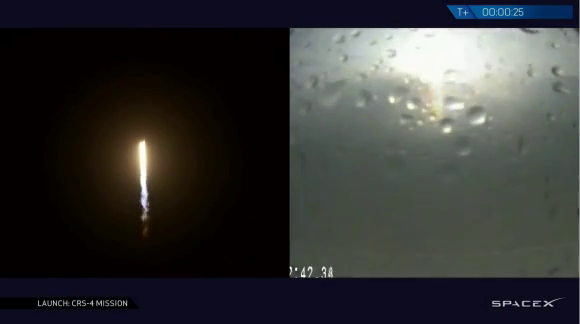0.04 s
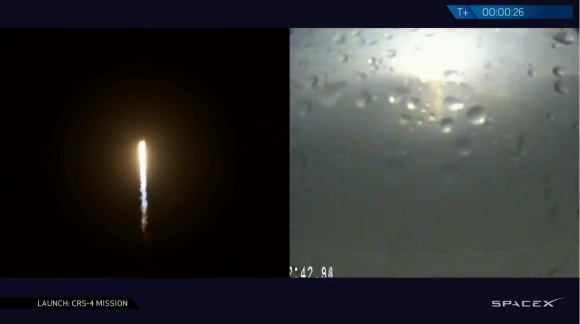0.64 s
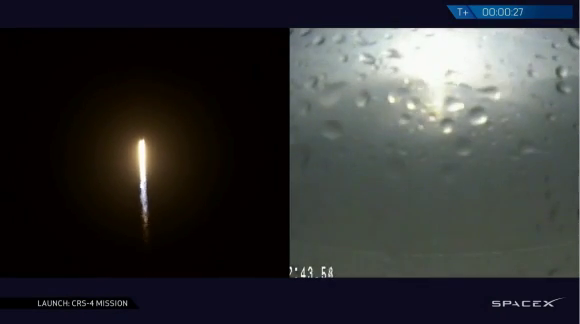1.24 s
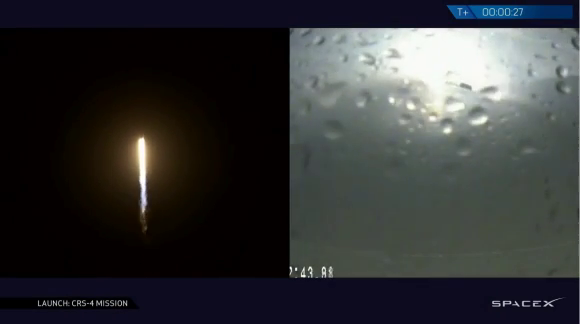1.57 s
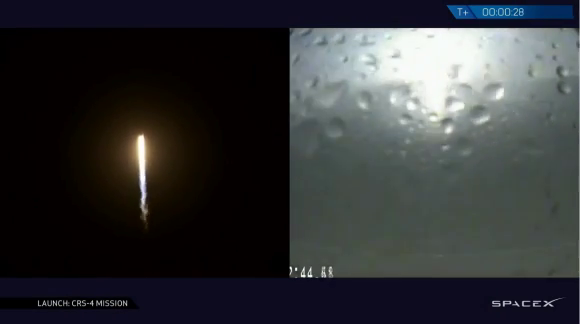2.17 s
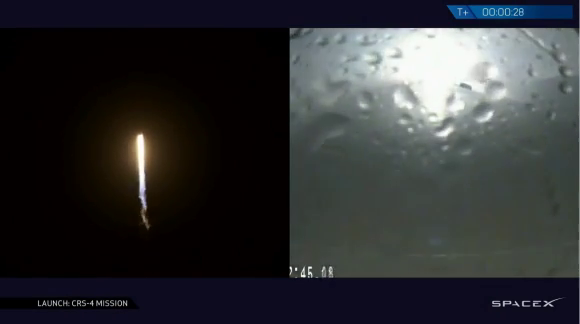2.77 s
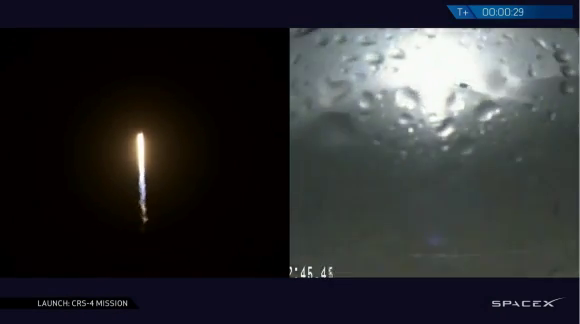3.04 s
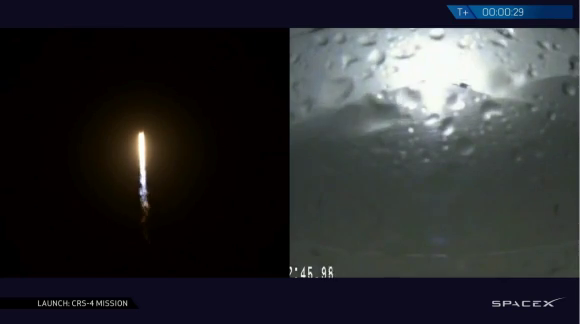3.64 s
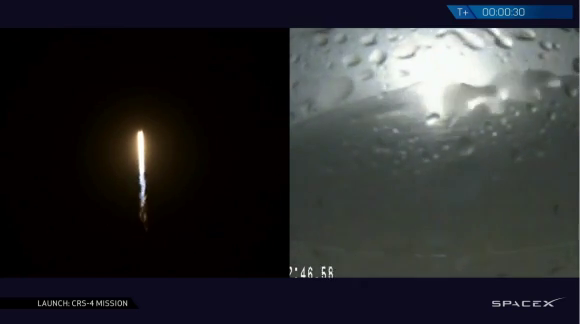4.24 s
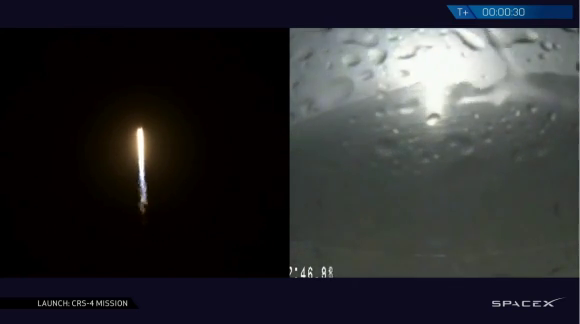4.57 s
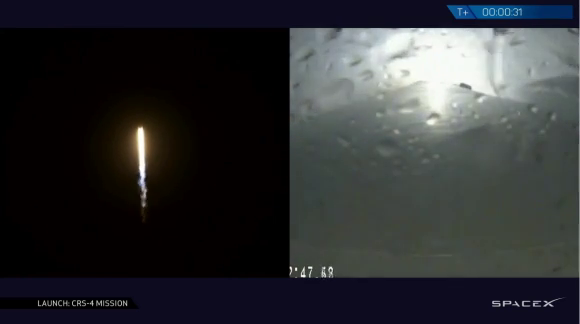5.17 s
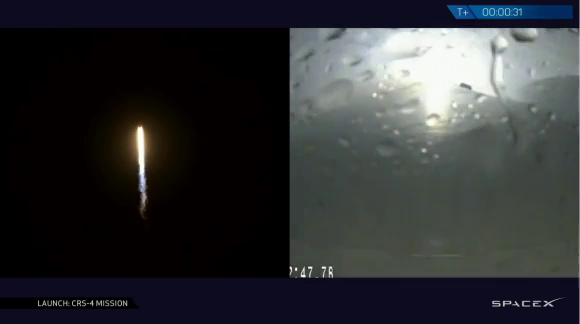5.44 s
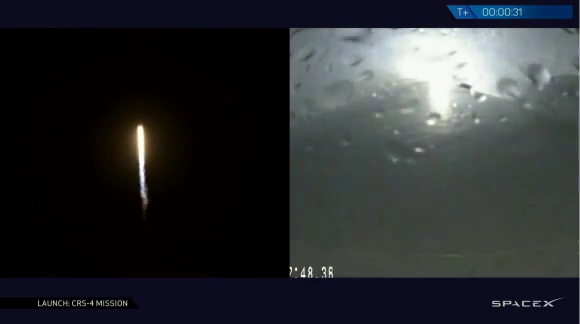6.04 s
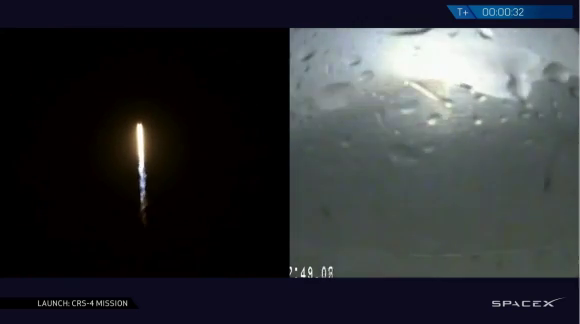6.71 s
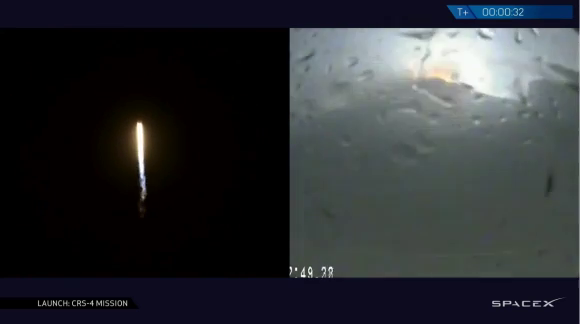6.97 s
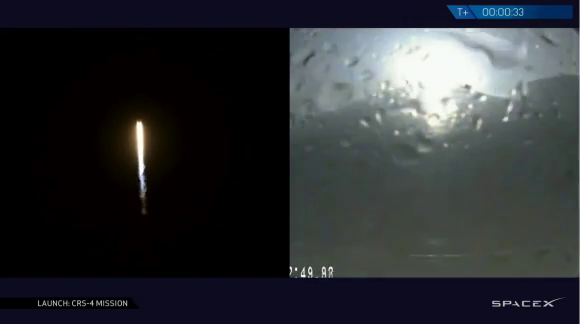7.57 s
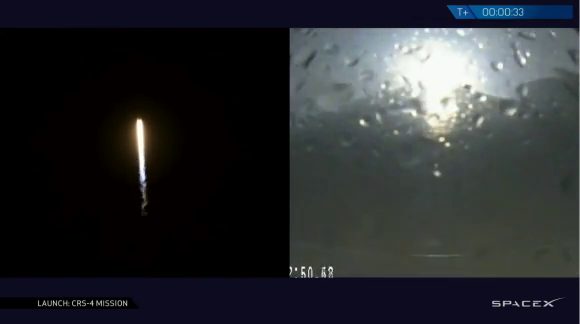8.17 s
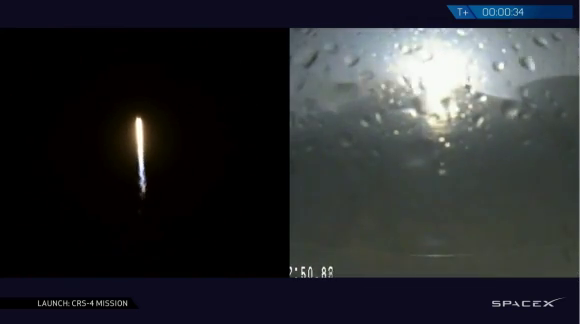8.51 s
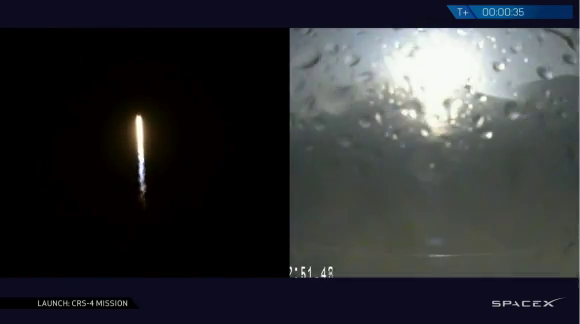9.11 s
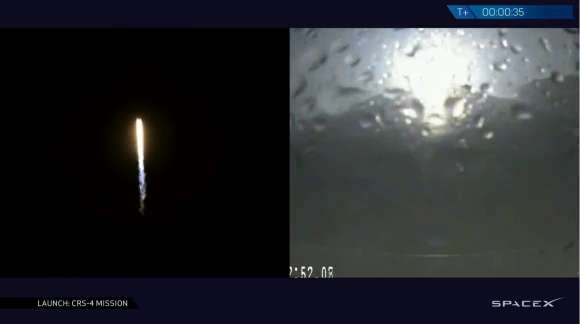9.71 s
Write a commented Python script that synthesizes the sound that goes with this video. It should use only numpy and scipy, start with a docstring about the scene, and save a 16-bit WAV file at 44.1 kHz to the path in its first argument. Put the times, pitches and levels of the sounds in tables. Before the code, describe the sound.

The deep, rushing roar of a climbing rocket, full of sharp crackles, gradually recedes into a low rumble.

```python
"""On open ground beside a wall, one microphone listens to a rocket climbing away at full thrust.
Turbulence in the exhaust rumbles, and its steepest waves arrive as sawtooth shocks that crackle.
With distance the roar sinks and the air takes its top, while the deep bass stays; moving air
brings it back in swells. Close to the microphone a few dry ticks sound, and late on a faint hiss."""
import sys
import numpy as np
from scipy import signal
from scipy.fft import rfft, irfft, next_fast_len
from scipy.io import wavfile

SR = 44100
rng = np.random.default_rng(int(sys.argv[2]) if len(sys.argv) > 2 else 0)


def materialize(psi):
    """Save the field psi as 16-bit PCM at rate SR to the path in sys.argv[1].

    A 1-D psi becomes a single channel; in a 2-D psi each row is a channel.
    """
    bounded = np.clip(np.atleast_2d(psi).T, -1, 1)
    quanta = np.round(bounded * 32767).astype(np.int16)
    wavfile.write(sys.argv[1], SR, quanta)


N = 438177
TIME = np.arange(N) / SR

# moving air carries the roar down in swells: start_s, length_s, start_lift_db, end_lift_db
AIR_SWELLS = [(-0.05, 0.93, 1, 2), (1.62, 0.38, 2.5, 3), (2.75, 0.92, 1.4, 2), (3.9, 1, 1.8, 0.5),
              (5.1, 0.75, -1, 1.7), (7.12, 0.072, 2, 1.5), (7.38, 0.2, 3, -0.5), (8.05, 0.22, 1.1, 2.5),
              (8.31, 0.11, 3.5, 7.5), (8.61, 0.37, 5, 6)]


def amp(db):
    """Decibels to gain."""
    return 10 ** (np.asarray(db) / 20)


def unit_rms(x):
    """Scales x to rms 1."""
    return x / np.sqrt(np.mean(x ** 2) + 1e-20)


def curve(rows):
    """A table of times and values, read at every sample."""
    return np.interp(TIME, *np.transpose(rows))


def add(mix, start_s, sound):
    """Mixes a sound in at start_s."""
    part = mix[max(round(start_s * SR), 0):][:len(sound)]
    part += sound[:len(part)]


def below(x, hz):
    """The part of x under hz, with no delay."""
    return signal.sosfiltfilt(signal.butter(3, hz, fs=SR, output="sos"), x + 1e-18, padtype="even")


def delayed(x, delay_s):
    """x heard later by a delay that may move."""
    return np.interp(TIME - delay_s, TIME, x, left=0)


def coloured(x, colour):
    """Gives x a spectrum; a quarter turn of phase makes each click a sawtooth: slow rise, sudden drop."""
    hz, db = np.transpose(colour)
    size = next_fast_len(N + SR)
    bins_hz = np.fft.rfftfreq(size, 1 / SR)
    gain = amp(np.interp(np.log(bins_hz + 1), np.log(hz + 1), db))
    return irfft(rfft(x, size) * 1j * gain, size)[:N]


def sawteeth(clicks, colour):
    """Colours clicks so that a click of 1 makes a wave of peak 1."""
    return coloured(clicks, colour) / abs(coloured(signal.unit_impulse(N, "mid"), colour)).max()


def wander(rate_hz):
    """Random motion of rms 1, mostly slower than rate_hz."""
    step = 50
    t = np.arange(-SR, N + SR, step) / SR
    return unit_rms(np.interp(TIME, t, below(rng.standard_normal(len(t)), rate_hz * step)))


def swells(rows, edge_s=0.06):
    """Lift in dB: each swell comes in, leans up or down while it lasts, and falls back."""
    total_db = np.zeros(N)
    for start_s, length_s, *lift_db in rows:
        end_s = start_s + length_s
        gate = np.clip(.5 + np.minimum(TIME - start_s, end_s - TIME) / edge_s, 0, 1)
        total_db += np.interp(TIME, [start_s, end_s], lift_db) * gate
    return total_db


def plume(shocks_per_s=1150, steepening=1.35, steep_hz=3000, billow_db=0.95, billow_hz=45):
    """Smooth turbulence and one-sided shocks of very unequal size, bunched by billows in the jet."""
    # the jet grows more ragged as it climbs, and more so in a swell
    spread_db = 2.15 + .06 * TIME + .02 * swells(AIR_SWELLS)
    size = amp(spread_db * np.minimum(rng.exponential(1, N), 3.9))
    hit = rng.random(N) < shocks_per_s / SR
    trim = 1 / amp(spread_db ** 2 / 2)  # offsets the power that raggedness adds
    shocks = unit_rms(size * trim * hit)
    # the larger a shock, the steeper its front: the big ones own the treble
    steep = unit_rms(size ** steepening * trim * hit)
    shocks = below(shocks - shocks.mean(), steep_hz) + steep - below(steep, steep_hz)
    turbulence = amp(-1) * below(rng.standard_normal(N), 2 * steep_hz)
    return (turbulence + shocks) * amp(billow_db * wander(billow_hz))


def ground_scatter(x, tail_db=-6, t60_s=0.15):
    """Rough ground smears every click into a short diffuse tail."""
    decay = amp(-120 / (t60_s * SR))
    power = signal.lfilter([1 - decay], [1, -decay], x ** 2)
    return x + amp(tail_db) * np.sqrt(power) * rng.standard_normal(N)


def restless_air(x, strength=.1, fade_hz=1.1, stretch=.13, drift_hz=.4, top_hz=2000):
    """Bent paths through moving air stretch, shrink and fade, so a faint hollowness drifts about."""
    # extra travel time of each bent path: delay_s
    bent_paths = [.0021, .0033, .0047, .0074]
    paths = sum(wander(fade_hz) * delayed(x, delay_s * (1 + stretch * wander(drift_hz)))
                for delay_s in bent_paths)
    return x + strength * below(paths, top_hz)


def ground_echo(x, strength=.11, top_hz=1200):
    """The soft ground returns a faint, dull copy to the microphone."""
    # the echo shifts as the rocket moves: time_s, delay_s
    ground_delay = [(1.5, .0059), (4, .0047), (6.3, .0052), (9, .0044)]
    return x + strength * below(delayed(x, curve(ground_delay)), top_hz)


def wall_echo(x, dull_gain=0.17, dull_hz=480):
    """The nearby wall returns mostly the lows, which comb-filters the bass."""
    # the echo comes a little later as the rocket rises: time_s, delay_s
    wall_delay = [(0, .0109), (4, .01105), (8, .0114)]
    # the crisp, full-band part of the echo: time_s, gain
    crisp_part = [(0, 0.21), (4, 0.04), (6, 0), (7.6, 0.01), (8.6, 0.31), (9.94, 0.01)]
    echo = delayed(x, curve(wall_delay))
    return x + dull_gain * below(echo, dull_hz) + curve(crisp_part) * echo


def registers(x, deep_hz=125, rumble_hz=260, crackle_hz=1400):
    """Splits x into deep bass, rumble, roar and crackle, each of rms 1."""
    deep, low, body = below(x, deep_hz), below(x, rumble_hz), below(x, crackle_hz)
    return np.array([unit_rms(band) for band in (deep, low - deep, body - low, x - body)])


def exhaust(near_s=1, midway_s=4.2, receding_s=6.2, far_s=8.0, heave_db=0.6, rip_db=1.03):
    """The plume heard from the ground: distance shifts its colour and fades each register in its way."""
    # the exhaust's spectrum at four growing distances: frequency_hz, level_db
    near_colour = [(22, -22.5), (48, -13.5), (78, 0), (130, -3.5), (195, -0.5), (240, -1), (350, -9.5),
                   (410, -10), (520, -9.5), (660, -11.5), (810, -13), (1400, -18.5), (2100, -25.5),
                   (3000, -33.5), (5000, -53), (7000, -61), (10000, -69.5), (14000, -83)]
    midway_colour = [(22, -24.5), (48, -9.5), (80, -1.5), (135, -2.5), (175, -2), (225, -10.5), (290, -4.5),
                     (355, -4.5), (425, -13.5), (535, -9), (640, -14.5), (810, -14.5), (1400, -19.5),
                     (2100, -28.5), (3000, -36), (5000, -56), (8000, -71), (14000, -82.5)]
    receding_colour = [(22, -15), (35, -6.5), (54, 2), (100, 0.7), (140, -7.5), (178, -7), (205, -12),
                       (290, -8.5), (365, -13.5), (483, -15), (590, -20.5), (860, -19), (1280, -23.5),
                       (2000, -31), (3000, -39.5), (4500, -56.5), (7500, -76), (14000, -82.5)]
    far_colour = [(22, -13.5), (33, -7), (48, 1), (90, -2.5), (115, -1), (165, -1.9), (220, -8),
                  (290, -10.5), (450, -15.5), (540, -15.5), (700, -21.5), (900, -22), (1130, -26),
                  (1420, -28), (2000, -34), (3100, -44.5), (5000, -64.5), (7500, -81), (14000, -86.5)]
    # deep bass, rumble, roar and crackle sink, then level out: start_db, fall_db_per_s, floor_db
    distance_fades = [(-40.5, 4.5, -46), (-43.5, 3, -51), (-39, 2.5, -55), (-49.5, 2.5, -71.5)]
    arriving = restless_air(ground_scatter(plume()))
    at_microphone = hollow(wall_echo(ground_echo(arriving)))
    colours = [near_colour, midway_colour, receding_colour, far_colour]
    shares = [np.interp(TIME, [near_s, midway_s, receding_s, far_s], row) for row in np.eye(4)]
    bands = sum(share * registers(coloured(at_microphone, colour))
                for share, colour in zip(shares, colours))
    fades = [np.hypot(amp(start_db - fall * TIME), amp(floor_db))
             for start_db, fall, floor_db in distance_fades]
    swell = swells(AIR_SWELLS)
    low_surge, high_surge = billows()
    ebb_db = 10 * np.maximum(TIME - 9.35, 0)  # at last the low end ebbs too
    far = shares[-1]  # far away a swell brings back rasp, and no longer the deep bass
    deep_db = 0.82 * (1 - far) * swell + low_surge + heave_db * wander(rate_hz=5.8) - ebb_db
    rumble_db = 0.36 * swell + 0.26 * low_surge + heave_db * wander(rate_hz=3.3) - ebb_db / 2
    roar_db = swell + high_surge
    crackle_db = (0.67 + 0.26 * far) * swell + 0.43 * high_surge + rip_db * wander(rate_hz=24)
    return (bands * fades * amp([deep_db, rumble_db, roar_db, crackle_db])).sum(0)


def flurry(lead_s, decay_s):
    """Tiny shocks, of total energy 1, that gather to a peak 0.05 s in and die away."""
    t = TIME[:SR // 10] - 0.05
    shocks = rng.standard_normal(len(t)) * np.exp(-np.maximum(t / decay_s, -t / lead_s))
    return shocks / np.linalg.norm(shocks)


def cracks(front_hz=5500):
    """Each big shock has a front rounded by the air, a low thump, a snap and small shocks around it."""
    # the strongest shocks: time_s, level_db, then relative to that level thump_db, cluster_db, snap_db
    big_shocks = [(0.206, -36, -3, -1, 3), (0.235, -42, -4, 0.5, -7), (0.347, -32, -1, -3, -9),
                  (0.446, -33, -16, 2.5, -15.5), (0.489, -33, -5.5, 6.5, -11), (0.657, -37, -0.5, 4, 1.5),
                  (0.757, -29.5, -5.5, 5, -17), (0.799, -38.5, -7.5, 7.5, -9.5), (0.922, -31, -7.5, 6, 0),
                  (1.177, -35, -1, 3, -5), (1.226, -38, 3, 4, -6), (1.3, -37.5, 0.5, 7, -14),
                  (1.333, -36, 1, -2.5, -7.5), (1.435, -27.5, -3.5, -3.5, -20), (1.563, -31, 0, -0.5, -9),
                  (1.678, -35.5, 3, 5, -9), (1.745, -25.5, -6.5, -4.5, -17), (1.875, -33.5, -7.5, -8, -14),
                  (1.988, -30, 1.5, 1, -12), (2.019, -35, -2, -3, -15), (2.078, -32.5, -2.5, 4, -6),
                  (2.357, -35, -2.5, 6.5, -4), (2.448, -36, -11.5, 6.5, -10), (2.595, -35, -7.5, 5.5, -3),
                  (2.742, -37.5, -5.5, -1, -4), (2.807, -41, 9.5, 7, -3), (2.902, -36, -16, 8, -10),
                  (3.051, -38, -7.5, 0.5, -4.5), (3.117, -40, 11.5, 6.5, -4), (3.248, -43.5, -6.5, 5.5, -2),
                  (3.31, -33, -3, 4, -13.5), (3.374, -37.5, -8.5, -0.5, -2.5), (3.452, -35, -4.5, -2, -16),
                  (3.536, -31.5, -13.5, -0.5, -11), (3.661, -33.5, -2, 1, -15),
                  (3.925, -37, -5.5, 3.5, -14), (4.235, -40, 0.5, 9, -12), (4.432, -41, -7, 9, -7),
                  (4.484, -41.5, -5, 1.5, -7), (4.641, -38.5, 4.5, -1.5, -10.5),
                  (5.073, -47.5, -6, -1, -4.5), (5.137, -38.5, 2, 3, -13), (5.221, -46.5, -6, -0.5, -6),
                  (5.464, -48, 1.5, 1, -5), (5.482, -46, -4, -2, 3), (5.513, -45.5, -3.5, -2, -2),
                  (5.596, -44, -0.5, 4, -4.5), (5.768, -48.5, -5.5, -1, 4), (5.808, -46, -7, -3, -3),
                  (5.896, -44, -7.5, -1.5, -0.5), (5.977, -47.5, -2, -1.5, -2), (6.054, -44, -5, -0.5, -2),
                  (6.284, -44.5, -5, 1, -2), (6.356, -44.5, 5, 1, -9), (6.658, -47, 2.5, 1, -1),
                  (6.805, -49.5, -1, 0, -6), (8.213, -49.5, 2.5, -7, 2), (8.27, -48.5, 17.5, -6, -8),
                  (8.308, -48.5, -3.5, 2, -5), (8.518, -45, -4, -3, 1), (8.578, -42, 1.5, -11.5, -15),
                  (8.615, -46, -0.5, -0.5, -7), (8.782, -44, -5, -0.5, -14), (8.813, -42.5, -14.5, 2, -13),
                  (8.848, -44, -8, 1, -12), (8.877, -40.5, -10.5, -3.5, -18), (8.905, -44, -8, 2, -13),
                  (8.943, -35.5, -13, -6, -12.5), (9.485, -51, 0, -1, -0.5), (9.791, -46, 10, -5, -3)]
    # spectra of the crack, its low thump and its bright snap: frequency_hz, level_db
    crack_colour = [(150, 3.5), (400, 4.5), (1000, 0.5), (2000, -10), (3100, -19.5), (5000, -37.5),
                    (8000, -48.5), (10000, -52), (14000, -68)]
    thump_colour = [(30, -28), (80, 9), (200, -3), (400, -2), (1200, -70)]
    snap_colour = [(300, -24), (1200, 2), (2200, 6), (3200, -0.5), (4300, -14), (6000, -35), (10000, -39),
                   (14000, -48)]
    fronts, clusters, thumps, snaps = np.zeros((4, N))
    for time_s, level_db, thump_db, cluster_db, snap_db in big_shocks:
        add(fronts, time_s, amp([level_db]))
        add(clusters, time_s - 0.05, amp(level_db + cluster_db) * flurry(lead_s=0.004, decay_s=0.015))
        add(thumps, time_s, amp([level_db + thump_db]))
        add(snaps, time_s - 0.05, amp(level_db + snap_db) * flurry(lead_s=0.001, decay_s=0.0035))
    rounded = amp(-1.8) * below(fronts, front_hz)
    crack = amp(1) * sawteeth(rounded + clusters, crack_colour)
    thump = amp(-4) * sawteeth(thumps, thump_colour)
    snap = amp(-1) * sawteeth(snaps, snap_colour)
    return wall_echo(crack + thump + snap)


def billows(half_width_s=0.013):
    """Lift in dB of the deep bass and of the roar as big billows in the jet pass."""
    # one short surge for each billow: time_s, deep_lift_db, roar_lift_db
    surges = [(0.38, 5, 4.5), (0.5, 6.5, 3), (0.68, 9.5, 5.5), (0.809, 6, 5.5), (1.01, 0, 4.5),
              (1.228, 4, -1), (1.44, 9, 2), (1.75, 7, -3), (2.02, 6, 5.5), (2.22, 9, 3.5), (2.6, 0.5, 4.5),
              (2.82, 12, -2), (3.121, 13.5, -0.5), (4.245, 2, -0.5), (4.76, 0, -0.5), (5.15, 8, 3),
              (5.48, -2, 4), (6.12, 11, 0.5), (6.37, 9.5, -4), (6.53, 1, 1.5), (6.8, 3, -1),
              (6.98, 9.5, -1), (7.5, 6, -2.5), (7.7, 3, 3.5), (8.13, 8.5, -3), (8.74, 3, 0), (9.05, 8, 5),
              (9.21, 7.5, 1)]
    bump = np.exp(-((TIME[:SR // 5] - 0.1) / half_width_s) ** 2)
    low, high = np.zeros((2, N))
    for time_s, deep_lift_db, roar_lift_db in surges:
        add(low, time_s - 0.1, deep_lift_db * bump)
        add(high, time_s - 0.1, roar_lift_db * bump)
    return low, high


def ticks(gain_db=10):
    """Tiny dry clicks close to the microphone, with no ring."""
    # each tick, before the gain: time_s, level_db
    close_ticks = [(0.6154, -57.5), (3.589, -63), (5.086, -57.5), (7.314, -55), (8.3445, -63), (9.101, -65),
                   (9.543, -60.5)]
    # a tick's spectrum: frequency_hz, level_db
    tick_colour = [(300, -2), (1500, 13), (3000, 4), (4500, -11), (7000, -15), (14000, -23)]
    clicks = np.zeros(N)
    for time_s, level_db in close_ticks:
        add(clicks, time_s, amp([level_db + gain_db]))
    return sawteeth(clicks, tick_colour)


def hollow(x):
    """For a moment the roar turns hollow: one band swells and sinks back."""
    # the swelling band: time_s, length_s, centre_hz, width_hz, lift_db
    hollow_band = (1.226, 0.18, 760, 310, 5.7)
    time_s, length_s, centre_hz, width_hz, lift_db = hollow_band
    band = signal.lfilter(*signal.iirpeak(centre_hz, centre_hz / width_hz, SR), x)
    bump = np.exp(-(2 * (TIME - time_s) / length_s) ** 2)
    return x + band * (amp(lift_db * bump) - 1)


def hiss(rest_db=-92.7, flicker_db=1.0, flicker_hz=30):
    """A thin, flickering hiss near the microphone comes and goes above the roar."""
    # puffs of hiss: start_s, length_s, start_lift_db, end_lift_db
    puffs = [(6.85, 0.13, 4, 7), (7.35, 0.87, 8, 6.5), (8.36, 0.14, 10, 13), (8.75, 0.25, 3, 3.5),
             (9.78, 0.26, 3, 9)]
    # the hiss's spectrum: frequency_hz, level_db
    hiss_colour = [(1000, -15.5), (4000, 4), (7000, 2), (10000, -1.5), (14000, -4)]
    level_db = rest_db + swells(puffs, edge_s=0.25) + flicker_db * wander(flicker_hz)
    return unit_rms(coloured(rng.standard_normal(N), hiss_colour)) * amp(level_db)


def scene():
    """The distant rocket and the small sounds close by, at one microphone."""
    return (exhaust() + cracks() + ticks() + hiss())[None]


def record(dry, edge_hz=14500):
    """The recorder's band limit cuts the highest treble."""
    band_limit = signal.firwin(511, edge_hz, window=("kaiser", 9), fs=SR)
    return signal.oaconvolve(dry, band_limit[None], "same")


dry = scene()
out = record(dry)
materialize(out)
```